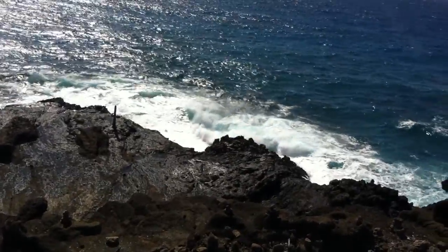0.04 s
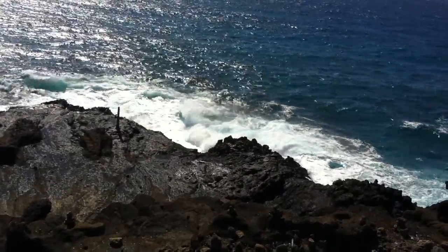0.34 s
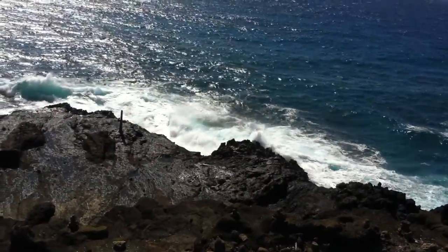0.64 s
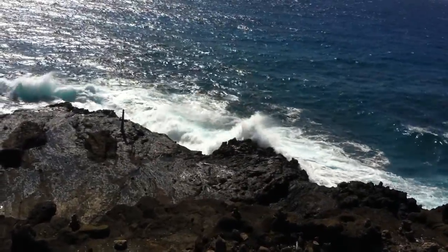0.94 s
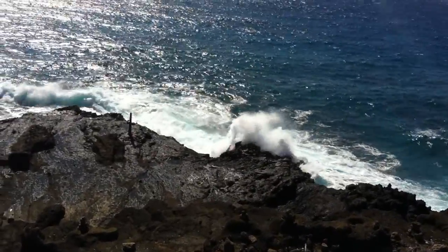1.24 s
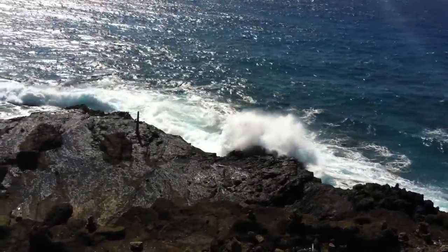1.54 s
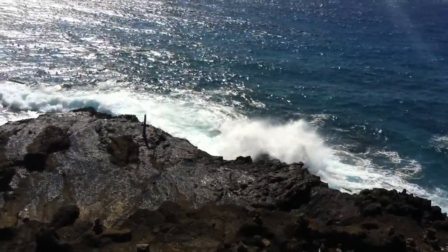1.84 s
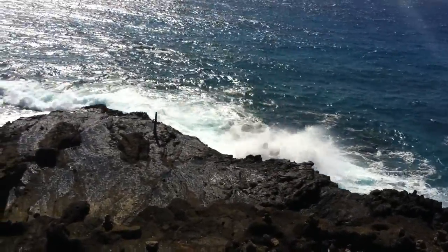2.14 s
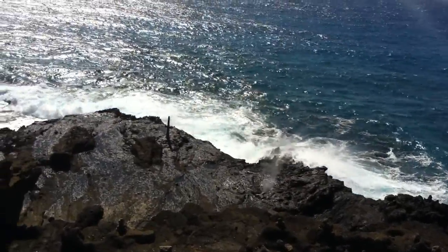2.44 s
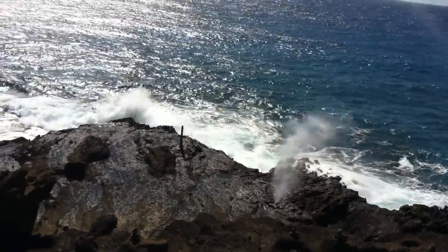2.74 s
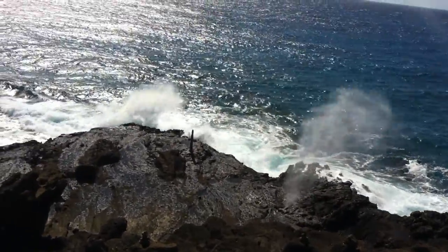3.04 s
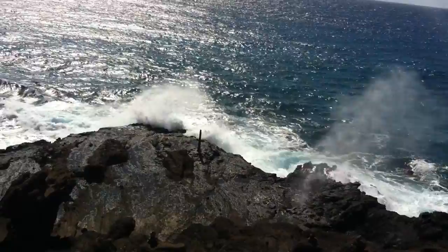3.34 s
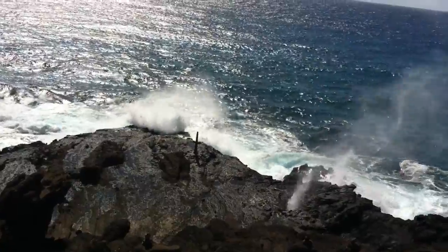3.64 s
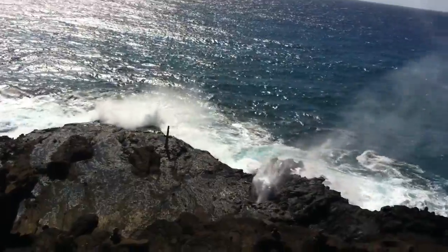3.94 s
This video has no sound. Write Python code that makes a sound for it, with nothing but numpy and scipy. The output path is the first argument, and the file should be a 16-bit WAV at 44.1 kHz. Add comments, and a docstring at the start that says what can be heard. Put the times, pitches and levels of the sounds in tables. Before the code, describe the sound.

Gusts of wind hit the microphone directly, making a continuous low, uneven rumble broken by short bursts of rough crackle. Behind it, waves breaking on a rocky shore well below give a faint, smooth hiss.

```python
"""Gusty wind rumbles on a bare microphone, on a cliff above breaking surf.
Eddies push on the diaphragm without pause and buffets add a rough flutter; in the hardest blasts
the airflow tears into dense crackle and lone cracks. Far below, surf and spray hiss on the rocks.
The recorder's limiter holds the peaks, so the sea ducks after each blast and creeps back."""
import sys
import numpy as np
from scipy import signal
from scipy.fft import rfft, irfft
from scipy.io import wavfile
from scipy.ndimage import uniform_filter1d

SR = 44100
rng = np.random.default_rng(int(sys.argv[2]) if len(sys.argv) > 2 else 0)


def output_pcm(signal):
    """Save a mono or channel-first signal as 16-bit PCM at the path in sys.argv[1].

    Samples are clipped to [-1, 1] before scaling.
    """
    pcm = np.clip(np.atleast_2d(signal).T, -1, 1) * 32767
    wavfile.write(sys.argv[1], SR, np.round(pcm).astype(np.int16))


N = 176400

# wind pressure on the microphone (time [s], relative level [dB])
WIND_PRESSURE = [(0.0,-19),(0.03,-24.5),(0.06,-15.5),(0.2,-14),(0.24,-28),(0.3,-28.5),(0.32,-20.5),(0.37,-20),(0.46,-14),(0.48,-20.5),(0.61,-16),(0.63,-19.5),(0.67,-13),(0.71,-20),(0.76,-30),(0.78,-26.5),
                 (1.02,-24),(1.08,-22),(1.22,-15),(1.28,-27),(1.3,-15),(1.34,-23),(1.39,-18.5),(1.53,-15),(1.56,-29.5),(1.64,-19.5),(1.78,-30.5),(1.8,-21.5),(1.86,-17),(1.92,-21),(1.97,-15),(1.99,-25.5),
                 (2.09,-21),(2.11,-26.5),(2.19,-23),(2.21,-13),(2.28,-19),(2.42,-24.5),(2.59,-13.5),(2.66,-26),(2.78,-17),(2.8,-22.5),(2.86,-19.5),(2.93,-27),(2.97,-22.5),(3.04,-26),(3.17,-20.5),(3.27,-28.5),
                 (3.39,-28),(3.42,-13),(3.46,-22.5),(3.69,-20),(3.78,-23),(3.92,-11),(3.99,-23)]


def undb(db):
    """Decibels to gain."""
    return 10 ** (np.asarray(db) / 20)


def curve(rows):
    """Gain at every sample from (time [s], level [dB]) points."""
    return undb(np.interp(np.arange(N) / SR, *np.array(rows).T))


def colour(x, spectrum):
    """Minimum-phase filter of unit energy, shaped by (frequency [Hz], level [dB]) points."""
    hz, db = np.array(spectrum).T
    size = 4096
    bin_hz = np.maximum(np.arange(size // 2 + 1) * SR / size, 1)
    gain = undb(np.interp(np.log(bin_hz), np.log(hz), db))
    cepstrum = irfft(np.log(gain))
    cepstrum[1:size // 2] *= 2
    cepstrum[size // 2 + 1:] = 0
    ring = irfft(np.exp(rfft(cepstrum)))
    return signal.fftconvolve(x, ring / np.linalg.norm(ring))[:N]


def noise(spectrum):
    """Coloured noise of rms near 1."""
    return colour(rng.standard_normal(N), spectrum)


def even(x, span_s):
    """Bring the running rms over a span to 1."""
    span = int(span_s * SR)
    power = uniform_filter1d(uniform_filter1d(x * x, span), span)
    return x / np.sqrt(np.abs(power) + 1e-12)


def wander(per_s):
    """Random drift of spread near 1.6, heading for a new value so many times a second."""
    targets = rng.standard_normal(N // 20)
    return 1.98 * np.interp(np.arange(N) / SR * per_s, np.arange(len(targets)), targets)


def gusts(rows, rise_s, fall_s):
    """Envelope of (start [s], length [s], level [dB]) events: rise, hold, exponential fall."""
    t = np.arange(N) / SR
    power = np.zeros(N)
    for start, length, db in rows:
        rise = np.clip((t - start) / rise_s + .5, 0, 1)
        fall = np.exp(-np.clip((t - start - length) / fall_s, 0, 20))
        power += (undb(db) * rise * fall) ** 2
    return np.sqrt(power)


def volley(per_s, scatter_db):
    """Randomly timed pressure jumps of either sign and scattered size, rms 1."""
    jumps = (rng.random(N) < per_s / SR) * np.sign(rng.standard_normal(N))
    jumps *= undb(scatter_db * np.clip(rng.standard_normal(N), -2, 2))
    return jumps / jumps.std()


def dull(x, hz):
    """Low-pass: a blunter jump of pressure has less treble."""
    return signal.sosfilt(signal.butter(3, hz, fs=SR, output="sos"), x)


def rumble():
    """Eddies push on the bare diaphragm, as hard as the wind blows."""
    # colour of the eddies (frequency [Hz], relative level [dB])
    spectrum = [(25, -38.5), (50, -46), (80, -19), (125, -4), (175, 2), (260, -2.5), (400, -12),
                (600, -20.5), (1000, -39.5), (2000, -45), (5000, -78)]
    eddies = even(noise(spectrum), span_s=0.058)
    boost_db, flicker_db = 3.5, 1.53 * wander(per_s=70)
    return eddies * curve(WIND_PRESSURE) * undb(boost_db + flicker_db)


def ticks():
    """Tiny eddies tick against the microphone's port, louder in stronger wind."""
    # colour of a tick (frequency [Hz], relative level [dB])
    spectrum = [(40, -21), (130, -4), (400, 0.5), (800, -3), (1400, -15.5), (2500, -27), (13000, -71)]
    return colour(volley(per_s=160, scatter_db=6), spectrum) * curve(WIND_PRESSURE) * undb(-15)


def surf():
    """Waves break on the rocks far below the microphone, smooth with distance."""
    # colour of the surf from the cliff top (frequency [Hz], relative level [dB])
    spectrum = [(100, -15.5), (500, 4), (1000, -0.5), (2000, -1.5), (4000, -9.5), (7000, -16), (10000, -20),
                (16000, -30.5)]
    # swell of the breakers (time [s], level [dB])
    swell = [(0, -44.5), (.8, -53.5), (1.3, -47), (2.1, -51), (2.8, -50), (3.4, -47.5), (3.75, -44.5),
             (4, -46)]
    return noise(spectrum) * curve(swell) * undb(.25 * wander(per_s=8.1))


def spray():
    """Spray blown up from the rocks adds a brighter distant hiss."""
    # colour of the hiss (frequency [Hz], relative level [dB])
    spectrum = [(500, 2), (2000, 2.5), (4000, -1), (7000, 4.5), (10000, -3.5), (16000, -7)]
    # rise and fall of the spray (time [s], level [dB])
    plumes = [(0, -64.5), (1.8, -63.5), (2.5, -75), (2.8, -57), (3.4, -61), (3.7, -53), (4, -70)]
    return noise(spectrum) * curve(plumes)


def buffets():
    """Faster air sheds smaller eddies: a rough, flapping midrange right at the microphone."""
    # eddies flapping across the port (start [s], length [s], level [dB])
    flaps = [(.043, 0.0086, -11.5), (.112, 0.032, -20.5), (.164, 0.012, -3.5), (.194, 0.033, -15.5),
             (.39, 0.078, -24), (.592, 0.011, -16), (.648, 0.03, -13), (1.034, 0.013, -21),
             (1.138, 0.0072, -24), (1.192, 0.034, -20), (1.817, 0.048, -13), (1.945, 0.084, -13.5),
             (2.194, 0.025, -11.5), (2.325, 0.1, -14.5), (2.387, 0.029, -8), (2.843, 0.0322, -18),
             (2.952, 0.055, -21), (3.08, 0.038, -19.5), (3.138, 0.019, -18), (3.181, 0.008, -14.5),
             (3.432, 0.0067, -20), (3.843, 0.018, -3), (3.977, 0.013, -12.5)]
    # colour of the flutter (frequency [Hz], relative level [dB])
    spectrum = [(30, -34.5), (80, -33), (170, -6), (350, 8.5), (700, -4.5), (1200, -11), (2000, -21),
                (3500, -51.5), (8000, -74)]
    flutter = noise(spectrum) * undb(5 * wander(per_s=260))
    return even(flutter, span_s=0.018) * gusts(flaps, rise_s=0.0043, fall_s=0.002)


def cracks():
    """Single jumps of pressure hit the diaphragm, each with a brief ragged tail."""
    # lone cracks and thuds (time [s], strength [dB], treble edge [Hz])
    hits = [(.050, 6, 720), (.068, -1.5, 5400), (0.119, -3.5, 1660), (0.177, -4.5, 9150), (.203, 3, 15000),
            (0.207, 7, 13000), (0.469, 0.5, 5600), (.498, -13, 6000), (0.508, 0.5, 11000),
            (0.603, -11.5, 4420), (0.653, -0.5, 3460), (0.669, -1, 7500), (1.041, 9, 310),
            (1.214, -5.5, 2800), (1.238, -1.5, 3500), (1.244, -7.5, 5040), (1.321, -6.5, 3950),
            (1.404, -6, 14000), (1.420, 8, 7000), (1.449, 4.5, 12000), (1.469, -1, 9500), (1.521, 2, 8700),
            (1.53, -6, 4000), (1.566, -5, 1980), (1.802, -3, 1220), (1.872, 4.5, 4880), (1.892, 0, 8800),
            (1.924, -4.5, 4000), (1.93, -6, 7000), (2.008, 1, 4440), (2.014, -3.5, 6100), (2.194, -1, 5860),
            (2.361, 9, 9500), (2.370, -1, 15000), (2.435, 6, 12000), (2.461, 4.5, 12000),
            (2.483, -8, 11000), (2.496, 3, 7000), (2.557, 4, 10000), (2.598, 4, 8400), (2.811, -12, 2350),
            (2.997, -10, 1510), (3.121, -7, 1210), (3.154, 2, 398), (3.183, 5, 557), (3.845, 8, 1020),
            (3.857, 8.5, 8850), (3.877, 4, 15000), (3.925, 1.5, 14000), (3.935, -1, 10500)]
    # colour of a crack (frequency [Hz], relative level [dB])
    spectrum = [(30, -40), (100, -16.5), (250, 14), (800, 6), (2000, -1), (4000, -8.5), (7000, -21),
                (11000, -28), (16000, -36)]
    tail_s, tail_db = 0.0013, -19
    pressure, age = np.zeros(N), np.arange(N // 200) / SR
    for start, db, edge_hz in hits:
        rough = rng.standard_normal(len(age))
        jump = undb(tail_db) * rough * np.exp(-age / tail_s)
        jump[0] = np.sign(rough[0])
        i = int(start * SR)
        pressure[i:i + len(age)] += undb(db) * dull(jump, edge_hz)
    unit_peak = np.abs(colour(np.ones(1), spectrum)).max()
    return colour(pressure, spectrum) / unit_peak


def blasts():
    """The airflow tears at the microphone into clumps of pressure jumps, some blasts sharper than others."""
    # bursts of torn air (start [s], length [s], level before dulling [dB], treble edge [Hz])
    bursts = [(0.194, 0.016, -4, 10000), (0.513, 0.016, -13, 4800), (0.537, 0.011, -5, 2580),
              (1.398, 0.011, -10.5, 7000), (1.438, 0.054, -7.5, 9800), (1.489, 0.023, -8, 7000),
              (1.839, 0.012, -13, 3930), (1.848, 0.018, -6, 6750), (1.879, 0.012, -7.5, 5640),
              (1.898, 0.029, -22, 4360), (1.959, 0.0173, -12.5, 4530), (2.201, 0.017, -12, 2790),
              (2.353, 0.023, -7.5, 9900), (2.386, 0.044, -4, 6500), (2.431, 0.038, -5.5, 8400),
              (2.465, 0.024, -12, 6500), (2.496, 0.064, -5.5, 4700), (2.563, 0.0141, -4.5, 5000),
              (2.581, 0.023, -12, 3530), (3.864, 0.02, -7, 7140), (3.903, 0.0093, -10.5, 5500),
              (3.917, 0.023, -3, 8850), (3.941, 0.022, -12, 3160)]
    # colour of the crackle (frequency [Hz], relative level [dB])
    spectrum = [(25, -33), (60, -28.5), (130, -15.5), (250, 7), (700, 2), (1200, -0.5), (2300, -6),
                (4000, -13), (6300, -21.5), (10000, -33.5), (16000, -46)]
    crackle = colour(volley(per_s=1700, scatter_db=5.5), spectrum)
    clumps = even(crackle * undb(2.5 * wander(per_s=320)), span_s=0.0076)
    return sum(dull(clumps, edge_hz) * gusts([(start, length, db)], rise_s=0.00095, fall_s=0.00093)
               for start, length, db, edge_hz in bursts)


def scene():
    """One microphone on the cliff top: wind right on it, the sea far below."""
    wind = rumble() + ticks() + buffets() + blasts() + cracks()
    return (wind + surf() + spray())[None]


def record(dry):
    """The recorder limits the blasts, cuts deep bass, rounds the peaks and cuts the top."""
    threshold_rms, detect_s, release_s = 0.42, 0.0023, 0.16
    knee, headroom = .52, .17
    low_cut_hz, distortion_hz, top_hz = 75, 7000, 16000
    loudness = np.sqrt(np.abs(uniform_filter1d(dry[0] ** 2, int(detect_s * SR))))
    overshoot = np.maximum(loudness / threshold_rms - 1, 1e-9)
    # the limiter clamps at once and lets go slowly
    release = np.arange(N) / SR / release_s
    held = np.exp(np.maximum.accumulate(np.log(overshoot) + release) - release)
    limited = dry / (1 + held)
    lean = signal.sosfilt(signal.butter(1, low_cut_hz, "high", fs=SR, output="sos"), limited)
    # peaks above the knee saturate, with the distortion's treble softened
    excess = lean - np.clip(lean, -knee, knee)
    shaved = excess - headroom * np.tanh(excess / headroom)
    rounded = lean - signal.sosfiltfilt(signal.butter(2, distortion_hz, fs=SR, output="sos"), shaved)
    return signal.sosfilt(signal.ellip(8, .2, 70, top_hz, fs=SR, output="sos"), rounded)


dry = scene()
out = record(dry)
output_pcm(out)
```